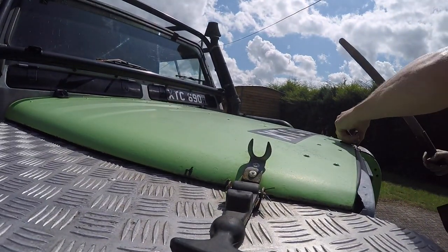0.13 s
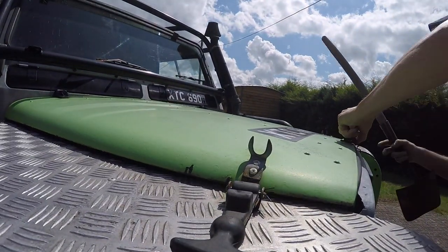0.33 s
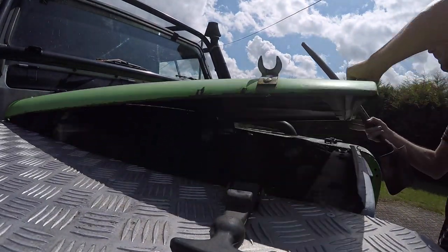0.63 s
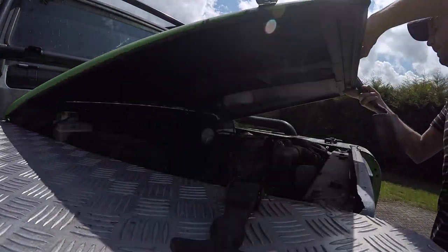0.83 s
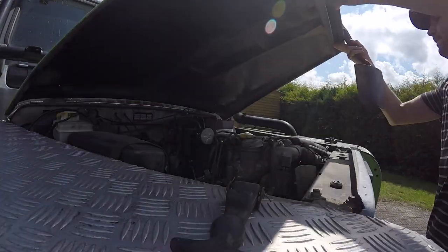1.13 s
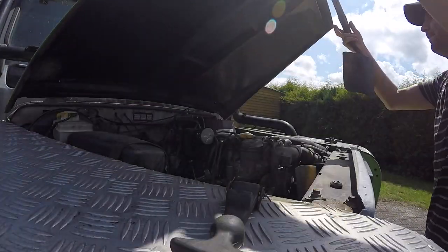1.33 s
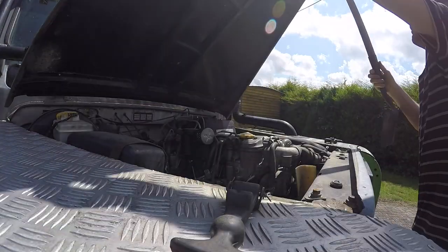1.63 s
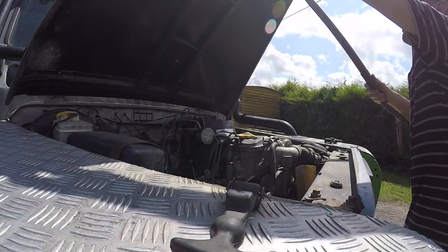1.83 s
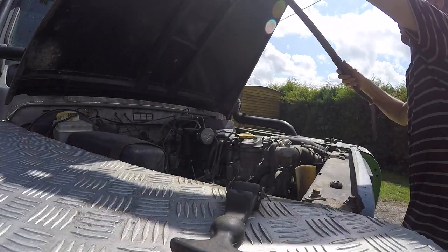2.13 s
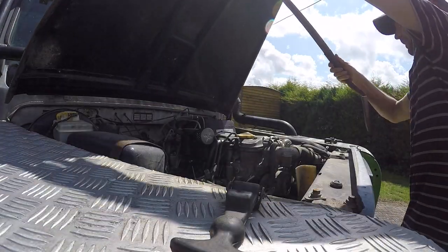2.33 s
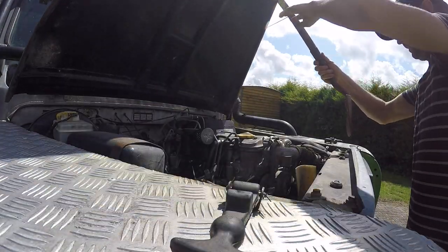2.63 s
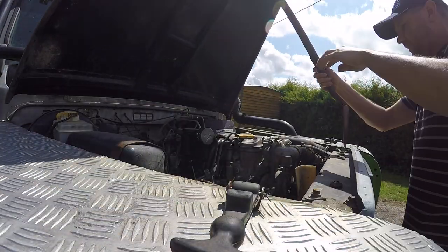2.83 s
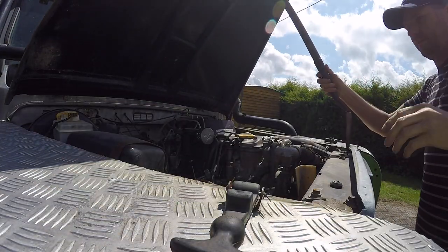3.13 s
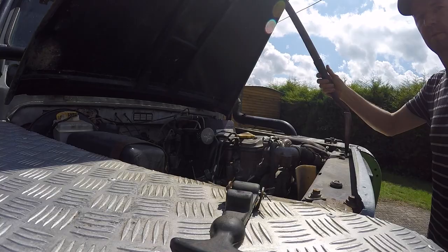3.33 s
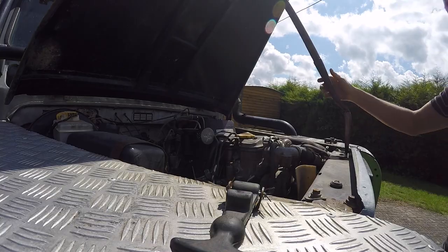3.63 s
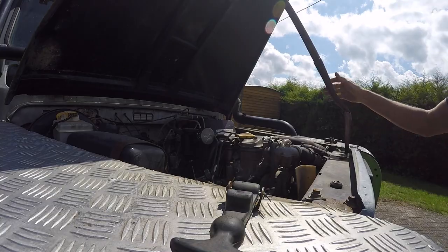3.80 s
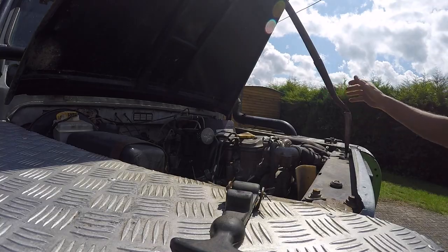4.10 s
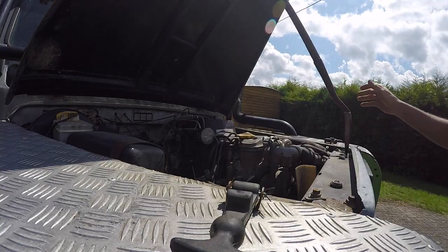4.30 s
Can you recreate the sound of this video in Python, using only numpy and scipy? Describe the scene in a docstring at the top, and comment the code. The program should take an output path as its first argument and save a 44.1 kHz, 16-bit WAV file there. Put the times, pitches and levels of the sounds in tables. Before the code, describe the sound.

Outdoors, a microphone sits close on a vehicle's wing, catching deep, uneven wind buffeting and faint dull hiss. From 0 to 0.2 s a short hand scrape and a rapid cluster of small steel clicks release the catch, strongest near 0.12 s with a slight plate ring. Wind thumps around 0.35-0.4 s. At 0.74 s the sheet-steel panel gives a hollow, ringing knock. Light ticks lead to the loudest event, a sharp metallic crack at 1.13 s, with weaker clicks at 1.18 and 1.26 s. After a quieter stretch of faint sliding and ticks, a muffled panel thud lands at 2.14 s, with a deep boom at 2.2 s and a crisp click at 2.38 s. Gusts rumble heavily from 2.1 to 2.9 s. At 3.04-3.08 s a panel knock and chattering metallic clank mark the stay locking, with a short boomy ring. Afterwards only wind remains, with a low thump near 4.13 s and very faint rubbing.

```python
"""The bonnet of an off-road vehicle is opened outdoors, heard at a microphone on its wing.
The sheet-steel panel is struck: soft-contact blows excite its crowded modes, its skin modes and a deep boom.
Catch and stay give sharp steel clicks with rebounds and damped modes; the stay drops clanking into its lock.
Hands and hinges slide as grainy noise, and a diffuse tail returns from the yard.
Wind turbulence buffets the microphone throughout, as banded noise and single eddies, over faint hiss."""
import sys
import numpy as np
from scipy import signal
from scipy.fft import rfft, irfft, next_fast_len
from scipy.io import wavfile
from scipy.ndimage import uniform_filter1d

SR = 44100
rng = np.random.default_rng(int(sys.argv[2]) if len(sys.argv) > 2 else 0)


def output_pcm(signal):
    """Save a mono or channel-first signal as 16-bit PCM at the path in sys.argv[1].

    Samples are clipped to [-1, 1] before scaling.
    """
    pcm = np.clip(np.atleast_2d(signal).T, -1, 1) * 32767
    wavfile.write(sys.argv[1], SR, np.round(pcm).astype(np.int16))


N = 196641  # samples in the scene
SIZE = 2 ** 15  # samples in one blow
AGE, TIME = np.arange(SIZE) / SR, np.arange(N) / SR  # s since a blow, s since the start
HZ = np.fft.rfftfreq(SIZE, 1 / SR) + 1  # the 1 Hz offset keeps logarithms finite


def undb(db):
    """Level definition: decibels to amplitude gain."""
    return 10 ** (np.asarray(db) / 20)


def read(points, hz):
    """Logarithmic pitch scale: a (f/Hz, value) table interpolated on log frequency."""
    f, value = np.transpose(points)
    return np.interp(np.log(hz), np.log(f), value)


def noise(colour, size):
    """Spectral shaping: white noise weighted by a colour and scaled to rms 1."""
    n = next_fast_len(size, True)
    hz = np.fft.rfftfreq(n, 1 / SR) + 1
    spectrum = rfft(rng.standard_normal(n)) * undb(read(colour, hz))
    x = irfft(spectrum, n)[:size]
    return x / x.std()


def wander(hz):
    """Low-passed random process: smooth motion of spread 1, with a Gaussian roll-off at hz."""
    f = np.fft.rfftfreq(2 * N, 1 / SR)
    x = irfft(rfft(rng.standard_normal(2 * N)) * np.exp(-(f / hz) ** 2))[:N]
    return x / x.std()


def add(track, s, sound):
    """Superposition: mix a sound into the track from time s."""
    i = max(int(s * SR), 0)
    track[i:i + len(sound)] += sound[:N - i]


def fade(t60):
    """Exponential damping: amplitude falls 60 dB in t60 seconds."""
    return np.exp(-np.log(1000) * AGE / t60)


def soften(hz, corner_hz):
    """Contact stiffness: gain of a soft blow, falling 12 dB an octave above its corner."""
    return 1 / np.hypot(1, (hz / corner_hz) ** 2)


def ring(modes, stretch=1, scatter_db=4.5, build_cycles=2):
    """Modal superposition: damped sines, their levels and phases drawn anew for every blow."""
    hz, db, t60 = np.transpose(modes)[:, :, None]
    size = undb(db + scatter_db * rng.standard_normal(hz.shape))
    wave = np.sin(2 * np.pi * (hz * AGE + rng.random(hz.shape)))
    build = 1 - np.exp(-AGE * hz / build_cycles)
    return (size * wave * fade(t60 * stretch) * build).sum(0)


# reverberation time of the crowded modes before each blow's decay factor: (f/Hz, t60/s)
DECAY = [(120, 0.75), (400, 0.34), (1000, 0.18), (2200, 0.1573), (4500, 0.13), (12000, 0.12)]


def clatter(colour, contact, stretch, crack_db, crack_s, build_cycles):
    """High modal density: a brief crack, then noise bands; the low ones build up late and last longest."""
    spectrum = rfft(noise(colour, SIZE)) * contact
    high_pass = HZ ** 2 / (HZ ** 2 + 1500 ** 2)
    out = undb(crack_db) * irfft(spectrum * high_pass) * np.exp(-AGE / crack_s)
    centres = 110 * 2. ** np.arange(8)  # octave bands that overlap and sum to the whole
    for hz, share in zip(centres, np.eye(len(centres))):
        band = irfft(spectrum * np.interp(np.log(HZ), np.log(centres), share))
        build = 1 - np.exp(-(AGE * hz / build_cycles) ** 2)
        out += band * fade(read(DECAY, hz) * stretch) * build
    return out


# colour of the open-air hiss: (f/Hz, relative spectral level/dB)
AIR_COLOUR = [(150, 0), (300, -4), (600, -16), (1100, -19.5), (2000, -26), (4500, -30.5), (6500, -34.5),
              (10000, -38.5), (13000, -42.5), (15000, -52)]
AIR_DB = -49.5


def air():
    """Broadband ambient noise: faint, dull outdoor hiss whose level wavers a little."""
    return noise(AIR_COLOUR, N) * undb(AIR_DB + .4 * wander(hz=4))


BREEZE_DB = -29.5  # wind strength between gusts
HEAVE_DB, HEAVE_GROWTH = -28.5, .55  # slow heave: dB in the breeze, dB gained per dB of wind
FLUTTER_DB, FLUTTER_GROWTH = -33, 0.92  # faster flutter, likewise
LUMP_DB, LUMP_HZ = 2, 38  # depth and pace of the turbulence
EDDY_CYCLES = 0.57  # an eddy swells and dies within a cycle or so
# strength of the wind at the microphone: (t/s, level/dB)
WIND = [(0.0, -42.5), (0.15, -38.5), (0.36, -22.5), (0.56, -32), (0.8, -34.5), (1.27, -26), (1.55, -38.5),
        (1.9, -27.5), (2.15, -20), (2.45, -21.5), (2.85, -18.5), (2.98, -29.5), (3.12, -27.5),
        (3.45, -26.5), (3.7, -32), (4.16, -24.5), (4.32, -46), (4.46, -27)]
# colours of the slow heave and the faster flutter: (f/Hz, relative spectral level/dB)
HEAVE_COLOUR = [(8, 23), (20, 19), (30, 29.5), (48, 27), (65, -15), (120, -35.5), (1000, -110)]
FLUTTER_COLOUR = [(35, -37), (60, 3), (85, -1.5), (120, -12), (170, -17), (260, -25.5), (400, -36),
                  (800, -57.5), (4000, -100)]
# the strongest eddies hitting the microphone: (t/s of the centre, level/dB, f/Hz)
EDDIES = [(0.346, -15.5, 46), (0.406, -11, 36), (0.994, -14.5, 65.4), (2.137, -11.5, 45.6),
          (2.44, -14.5, 37.7), (2.579, -11.5, 70.6), (2.658, -9.5, 53.5), (2.748, -15, 118),
          (2.88, -7, 60.74), (4.134, -12, 41.37)]


def turbulence(colour, db, growth, gust_db):
    """Turbulent pressure fluctuation: lumpy noise whose slow swell follows the gusts alone."""
    flow = noise(colour, N) * undb(LUMP_DB * wander(hz=LUMP_HZ))
    flow /= np.sqrt(uniform_filter1d(flow ** 2, int(.18 * SR)))  # level out over 0.18 s
    return flow * undb(db + growth * gust_db)


def eddy(s, db, hz):
    """Vortex impact: a sine thump under a Gaussian envelope centred on s."""
    cycles = hz * (TIME - s)
    envelope = np.exp(-(cycles / EDDY_CYCLES) ** 2)
    return undb(db) * envelope * np.sin(2 * np.pi * (cycles + rng.random()))


def wind():
    """Flow noise at a microphone: heave and flutter, the flutter growing faster in a gust, plus eddies."""
    gust_db = np.interp(TIME, *np.transpose(WIND)) - BREEZE_DB
    out = turbulence(HEAVE_COLOUR, HEAVE_DB, HEAVE_GROWTH, gust_db)
    out += turbulence(FLUTTER_COLOUR, FLUTTER_DB, FLUTTER_GROWTH, gust_db)
    for s, db, hz in EDDIES:
        out += eddy(s, db, hz)
    return out


# hands and hinges sliding: (t/s of the centre, level/dB, 1/e half-width/s)
RUBS = [(-0.007, -44.5, 0.047), (0.272, -55.5, 0.026), (0.56, -59.5, 0.36), (1.085, -48.5, 0.034),
        (1.36, -60, 0.059), (1.543, -57, 0.028), (1.746, -63.5, 0.08), (2.353, -52.5, 0.021),
        (3.749, -70, 0.17), (4.371, -60, 0.11)]
# colour of the sliding: (f/Hz, relative spectral level/dB)
RUB_COLOUR = [(200, 3), (700, 4), (1500, -1), (2800, -5), (4500, -3), (8000, -14), (12000, -24),
              (15000, -33)]


def rubbing():
    """Friction noise: slides of hand and hinge, grainy from fast random level changes."""
    swell = sum(undb(db) * np.exp(-((TIME - s) / width) ** 2) for s, db, width in RUBS)
    return swell * noise(RUB_COLOUR, N) * undb(2.5 * wander(hz=150))


# the stay dropping into its lock: (t/s, level/dB)
LOCKS = [(3.051, -19), (3.0665, -23), (3.0725, -14.5), (3.076, -21), (3.081, -25)]
# mean modes of the locked stay: (f/Hz, level/dB, t60/s)
STAY = [(900, -13, .1), (1364, -3, .14), (1404, -9, .13), (1497, -8, .21), (2030, -8, .09), (2198, -8, .11),
        (2395, -5, .1), (2480, -11, .1), (2840, -16, .08), (3505, -15, .12), (3790, -18, .13)]
# colour of its crowded higher modes: (f/Hz, relative spectral level/dB)
STAY_COLOUR = [(200, -4.5), (700, -16), (950, 9), (1150, -21.5), (1400, 11.5), (1720, -8), (2300, 5),
               (3100, -10), (3650, -14), (4300, -16), (6000, -19.5), (14000, -44)]


def stay():
    """Repeated impact: the stay chatters into its lock and clanks with its own modes."""
    out = np.zeros(N)
    for s, db in LOCKS:
        hit = clatter(STAY_COLOUR, 0.94, stretch=0.58, crack_db=-4.5, crack_s=0.0065, build_cycles=1.3)
        add(out, s, undb(db) * (undb(-2) * hit + undb(-9.0) * ring(STAY)))
    return out


# colour of the click and of its crowded higher modes: (f/Hz, relative spectral level/dB)
CLICK_COLOUR = [(100, -31.5), (280, -3), (450, -0.5), (1000, 0), (1500, -4), (2200, -2), (2750, -9),
                (3800, -1), (5000, -6.5), (6300, -10.5), (11000, -19), (15000, -31)]


def snap(contact, snap_s):
    """Small-source radiation: the onset comes straight from the small contact, which radiates no bass."""
    x = irfft(rfft(noise(CLICK_COLOUR, SIZE)) * contact) * np.exp(-AGE / snap_s)
    x = signal.sosfilt(signal.butter(2, 1800, "high", fs=SR, output="sos"), x)
    return x * np.sqrt(snap_s * SR / 2 / np.sum(x ** 2))  # fix the energy of the burst


# mean modes of the fittings before contact weighting and decay factor: (f/Hz, level/dB, t60/s)
STEEL = [(440, -14, .26), (537, -13, .25), (853, -15, .22), (1034, -19, .15), (1513, -19, .18),
         (2070, -12, .15), (2200, -18, .19), (3040, -16, .13), (3535, -14, .13), (3770, -12, .12),
         (4235, -13, .12), (4985, -25, .17), (5450, -27, .3), (6450, -22, .12), (7960, -19, .1),
         (8140, -23, .14), (10150, -16, .11), (10370, -23, .12)]


def click(db, body_db, treble_db, ring_db, snap_db, stretch):
    """Hard impact: a snap, bodywork modes and steel modes, body_db weighting the low range of all three."""
    weights = [(1200, body_db), (3500, 0), (5000, 0), (9000, treble_db), (14000, treble_db / 2)]
    contact = undb(read(weights, HZ))
    tip = undb(snap_db) * snap(contact, snap_s=0.0044)
    body = clatter(CLICK_COLOUR, contact, stretch, crack_db=2.5, crack_s=0.0018, build_cycles=5.8)
    low_weights = weights[:2]
    modes = [(hz, mode_db + read(low_weights, hz), t60) for hz, mode_db, t60 in STEEL]
    return undb(db) * (tip + undb(-2.5) * body + undb(ring_db) * ring(modes, stretch))


REBOUND_S, REBOUND_DB = .0055, -12  # loose steel parts touch a second time: delay, relative level
REBOUND_TREBLE_DB, REBOUND_RING_DB, REBOUND_DECAY = 8.5, -9, 1.3  # second touch against the first
SNAP_DB, REBOUND_SNAP_DB = 0, -7  # sharp onset of a click and of its rebound, against their level
RELEASE_S, PLATE_DB = .118, -26  # time and level of the catch letting go
# steel on steel at catch and stay:
# (t/s, level/dB, share passed to the bodywork/dB, treble/dB, ring/dB, decay factor)
CLICKS = [(.035, -41.5, -25, 0, 2, 0.23), (.066, -50, 3, 21, 8, 0.72), (.099, -24.5, -21, 2.5, -19, 1.1),
          (0.1215, -18, -8, 2.5, -17, 0.46), (.131, -34.5, 4.5, -8, -7, 0.86),
          (.151, -33.5, -15, 0, 4.5, 0.35), (.208, -48.5, 3, -11, -5, 0.92),
          (0.3571, -42.5, 5.5, 13, 0, 0.45), (1.109, -36.5, -1, -1, -6, 0.97),
          (1.134, -7, 0.5, -5, -4, 0.72), (1.1753, -23.5, 2.5, -3.5, -0.5, 0.85),
          (1.2624, -28, 1, -2, -1.5, 0.77), (1.645, -57, 16, -11.5, -15, 0.39),
          (1.7924, -53.5, 11.5, -13, -7, 0.56), (2.0199, -52, 0.5, -1.5, 0, 0.68),
          (2.2135, -41, 12.5, -15, -4, 0.82), (2.3591, -43, 7.5, -2, -11, 1.25),
          (2.381, -19, 1, -3.5, -4, 0.85), (2.397, -31, 7.5, 5.5, -2.5, 0.65),
          (3.3748, -64, -11.5, 2.5, -4, 0.76)]
# mean modes of the plate under the catch: (f/Hz, level/dB, t60/s)
PLATE = [(452, -1.5, 0.31), (510, -7, 0.3), (637, -12, 0.31)]


def fittings():
    """Impact and rebound: clicks recur weaker, brighter and longer; the released catch rings its plate."""
    out = np.zeros(N)
    for s, db, body_db, treble_db, ring_db, stretch in CLICKS:
        first = click(db, body_db, treble_db, ring_db, SNAP_DB, stretch)
        second = click(db + REBOUND_DB, body_db, treble_db + REBOUND_TREBLE_DB,
                       ring_db + REBOUND_RING_DB, REBOUND_SNAP_DB, stretch * REBOUND_DECAY)
        add(out, s, first)
        add(out, s + REBOUND_S, second)
    add(out, RELEASE_S, undb(PLATE_DB) * ring(PLATE))
    return out


# colour of the panel's crowded modes: (f/Hz, relative spectral level/dB)
KNOCK_COLOUR = [(60, -4), (130, 0.5), (260, 2.5), (450, -4), (700, -2), (1000, -2.5), (1400, -10.5),
                (2500, -11), (5000, -17.5), (14000, -19.5)]


def knock(corner_hz, stretch):
    """Soft impact: one blow rattles the panel, a softer contact leaving out the treble."""
    contact = soften(HZ, corner_hz)
    return clatter(KNOCK_COLOUR, contact, stretch, crack_db=3.0, crack_s=0.0022, build_cycles=1.7)


SETTLE_S, SETTLE_DB, SETTLE_CORNER = .01, -4.5, 0.7  # second landing: delay, level, share of the corner
KNOCK_DECAY, SETTLE_DECAY = 0.86, 1.15  # decay factors of the two contacts
# knocks through the panel: (t/s, level/dB, contact corner f/Hz, skin ring/dB, deep boom/dB)
KNOCKS = [(.103, -27.5, 550, -10.5, 0.5), (.738, -19, 1713, -0.5, -15), (0.9633, -41, 1300, -22.5, -4),
          (1.064, -40, 2480, -3.5, -2), (2.143, -18, 677, -4.5, -20), (2.206, -26.5, 225, 3, 11.5),
          (3.039, -15.5, 2700, -14.5, -4.5), (3.068, -27.5, 2000, -13, 14.5)]
# mean modes of the skin before contact softening: (f/Hz, level/dB, t60/s)
SKIN = [(212, -9, .2), (236, -3, .8), (283, -12, .5), (301, -10, .7), (333, -14, .4), (388, -11, .3),
        (420, -12, .3), (455, -8, .3), (605, -12, .25), (865, -14, .2)]
# mean modes of the whole panel flexing: (f/Hz, level/dB, t60/s)
BOOM = [(139, -3, .6), (262, -17, .35)]


def bonnet():
    """Plate vibration: knocks settle with a duller second blow, ring the skin and boom the whole panel."""
    out = np.zeros(N)
    for s, db, corner_hz, skin_db, boom_db in KNOCKS:
        skin = [(hz, mode_db + 20 * np.log10(soften(hz, corner_hz)), t60) for hz, mode_db, t60 in SKIN]
        settle = undb(SETTLE_DB) * knock(corner_hz * SETTLE_CORNER, SETTLE_DECAY)
        first = knock(corner_hz, KNOCK_DECAY)
        resonance = undb(skin_db) * ring(skin) + undb(boom_db) * ring(BOOM)
        add(out, s, undb(db) * first)
        add(out, s + SETTLE_S, undb(db) * (settle + resonance))
    return out


# colour of the scattered tail: (f/Hz, relative spectral level/dB)
YARD_COLOUR = [(150, 4), (500, 0.5), (1500, 5.5), (4000, -12), (12000, -16.5)]


def yard(x, wet_db=-29, t60=0.32):
    """Diffuse scattering: vehicle, hedge and ground return a faint, dull tail."""
    tail = noise(YARD_COLOUR, SIZE) * fade(t60) * (1 - np.exp(-AGE / 0.0099))
    return x + undb(wet_db) * signal.fftconvolve(x, tail / np.linalg.norm(tail))[:N]


def scene():
    """Linear superposition: all sources at one microphone."""
    struck = fittings() + bonnet() + stay()
    return (yard(struck) + wind() + rubbing() + air())[None]


TOP_HZ = 15200  # upper band limit


def record(dry):
    """Amplitude and band limiting: peaks are clipped, then a steep low-pass cuts the top."""
    low_pass = signal.ellip(8, .2, 70, TOP_HZ, fs=SR, output="sos")
    return signal.sosfilt(low_pass, np.clip(dry, -.93, .93))


dry = scene()
out = record(dry)
output_pcm(out)
```